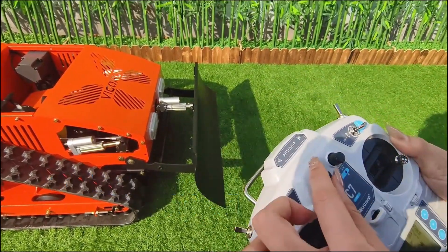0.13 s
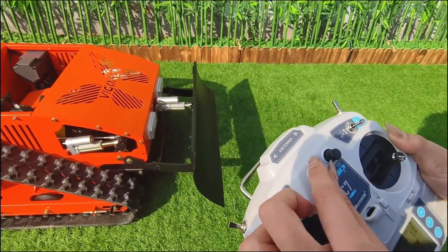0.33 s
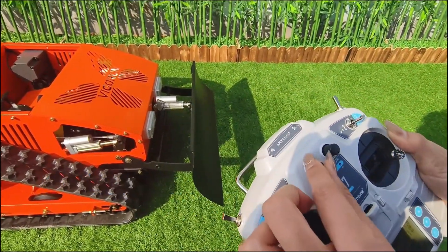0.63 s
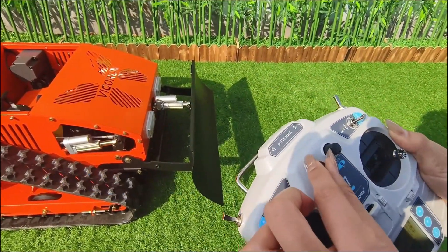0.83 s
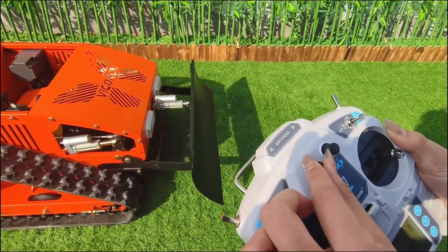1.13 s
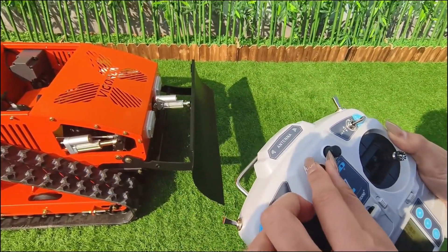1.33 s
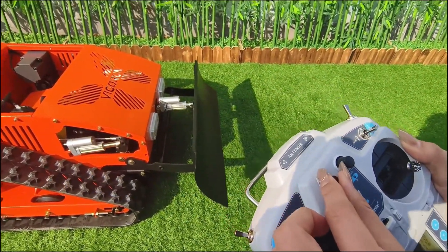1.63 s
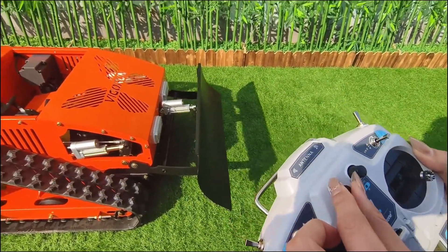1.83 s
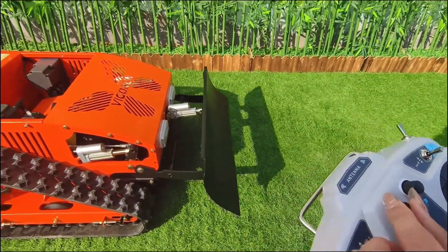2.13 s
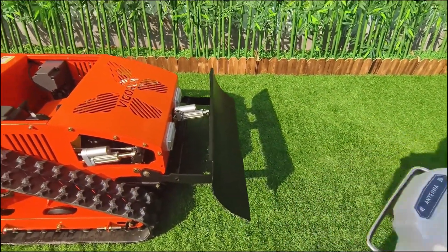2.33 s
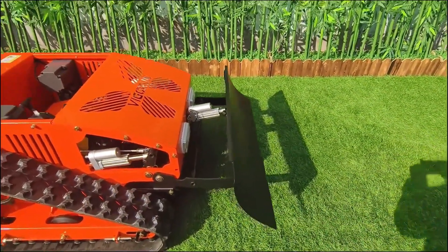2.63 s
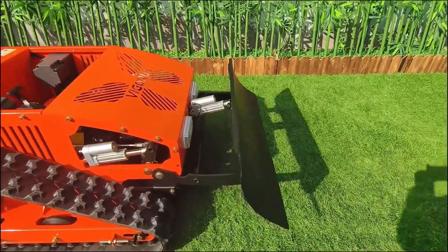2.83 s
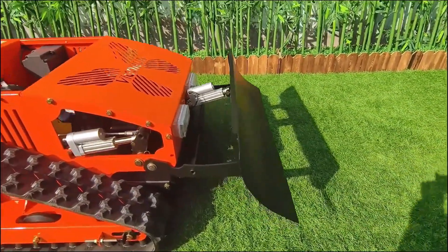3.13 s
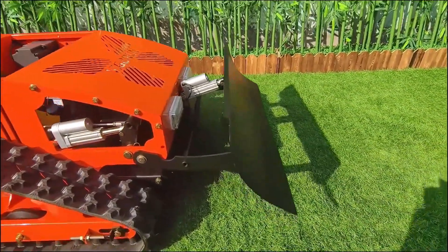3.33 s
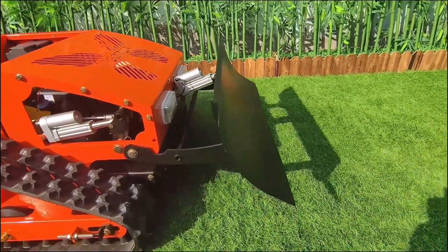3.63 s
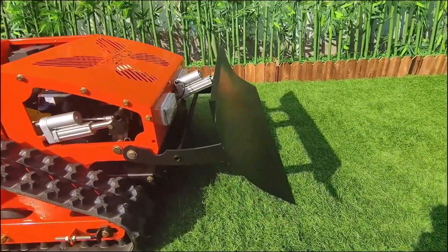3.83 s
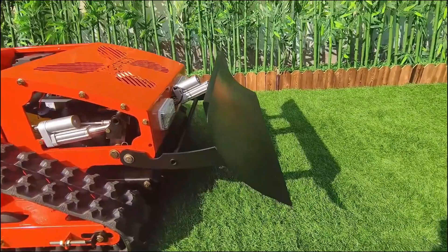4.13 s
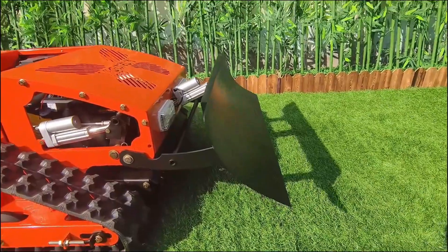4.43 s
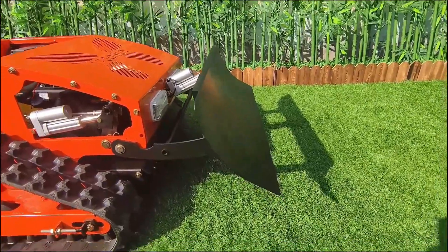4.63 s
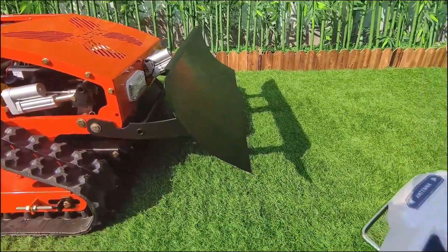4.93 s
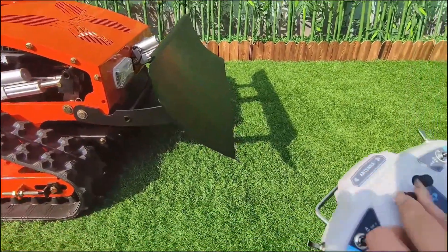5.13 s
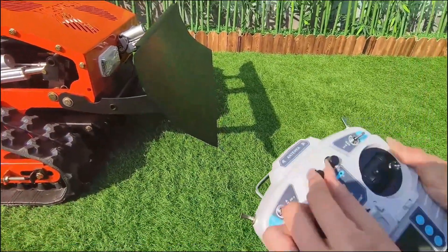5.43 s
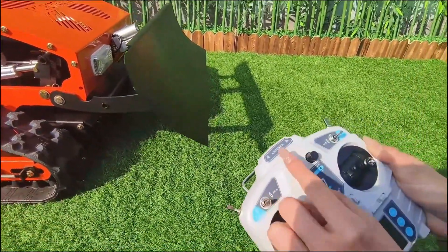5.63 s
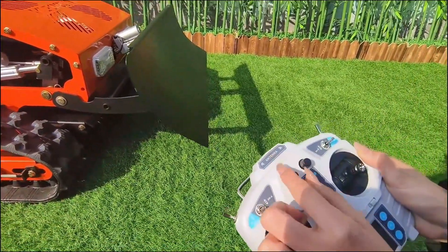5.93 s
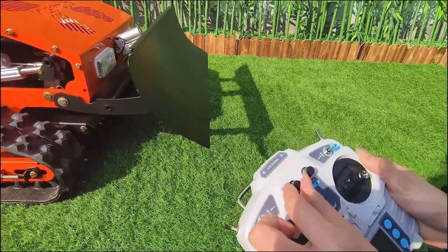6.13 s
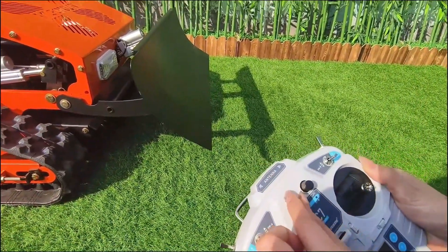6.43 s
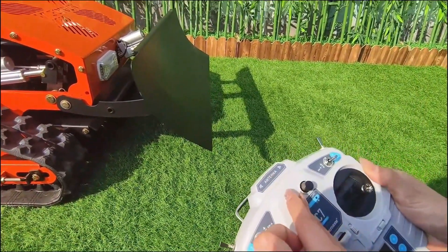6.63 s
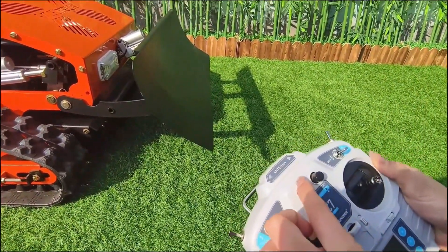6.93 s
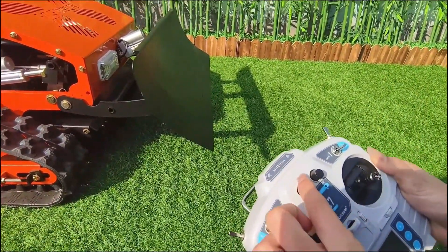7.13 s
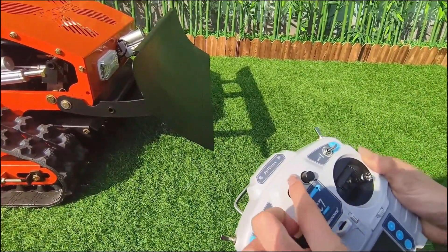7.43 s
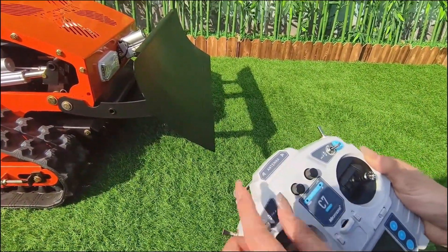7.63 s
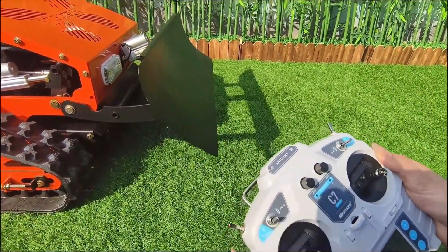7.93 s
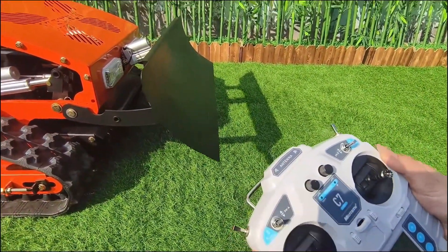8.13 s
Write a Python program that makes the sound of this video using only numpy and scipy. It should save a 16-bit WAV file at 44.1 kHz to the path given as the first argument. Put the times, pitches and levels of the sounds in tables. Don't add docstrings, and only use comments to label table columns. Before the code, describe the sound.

Quiet open air with soft wind thumps and a leafy rustle, then a geared electric motor whirs up quickly beside the listener. Its nasal, grinding whine with brush hiss and ringing steel holds steady, then sinks under weight and stops short. Feet stir grass, fingers scuff and tap a hollow plastic controller in a quick cluster. Finally a second, brighter and higher whine begins and runs to the end.

```python
import sys
import numpy as np
from scipy import signal
from scipy.fft import rfft, irfft
from scipy.io import wavfile
from scipy.ndimage import uniform_filter1d

SR = 44100
rng = np.random.default_rng(int(sys.argv[2]) if len(sys.argv) > 2 else 0)


def natural_amplitude(level_db):
    exponent = np.asarray(level_db, float) / 20
    return 10 ** exponent


def int16_out(signal):
    q = np.round(np.clip(np.atleast_2d(signal).T, -1, 1) * 32767)
    wavfile.write(sys.argv[1], SR, q.astype(np.int16))


N = 366030
TIME = np.arange(N) / SR
TEETH = 14
SWITCH_OFF_S = 4.476
LIGHT_LOAD_DB = -38


def in_time(rows):
    s, *columns = np.transpose(rows)
    return uniform_filter1d([np.interp(TIME, s, c) for c in columns], size=401, axis=1)


def at_hz(points, hz):
    points = np.array(points)
    return np.interp(np.log(hz), np.log(np.maximum(points[:, 0], 1)), points[:, 1])


def rms_one(x):
    return x / np.sqrt(np.mean(x ** 2) + 1e-20)


def drift(rate):
    r = np.exp(-80 * np.pi * rate / SR)
    slow = signal.lfilter([1], [1, -2 * r, r * r], rng.standard_normal(N // 40 + 2002))[2000:]
    return np.interp(np.arange(N) / 40, np.arange(len(slow)), rms_one(slow))


def ring(x, hz, t60):
    r = natural_amplitude(-60 / (max(t60, .005) * SR))
    w = 2 * np.pi * hz / SR
    return signal.lfilter([0, np.sin(w)], [1, -2 * r * np.cos(w), r * r], x + 1e-18)


def pan(x, db):
    return x * natural_amplitude(np.array([db / 2, -db / 2])).reshape(2, -1)


def split_at(x, hz):
    low = signal.sosfilt(signal.butter(4, hz, fs=SR, output="sos"), x)
    return low, signal.sosfilt(signal.butter(4, hz, "high", fs=SR, output="sos"), x)


def banded_noise(spectrum, likeness, patchy_db, rate, drive=0):
    low_hz, high_hz = max(spectrum[0][0], 12), min(spectrum[-1][0], 17000)
    edges = np.geomspace(low_hz, high_hz, 2 + int(3 * np.log2(high_hz / low_hz)))
    together = drift(rate)
    white = rng.standard_normal((2, 2, N)) + drive
    out = 0
    for k, (low, high) in enumerate(zip(edges, edges[1:])):
        band = signal.butter(2, [low, high], "band", fs=SR, output="sos")
        mid, side = signal.sosfilt(band, white[k % 2])
        hz = np.sqrt(low * high)
        alike = np.clip(at_hz(likeness, hz), -.99, .99)
        gain = natural_amplitude(at_hz(spectrum, hz) + patchy_db * (0.51 * together + drift(rate)))
        out = out + gain * (np.sqrt(1 + alike) * mid + np.sqrt(1 - alike) * side * [[1], [-1]])
    return out / np.sqrt(np.mean(out.mean(axis=0) ** 2))


def swells(floor_db, s, db, half_s):
    t = np.arange(0, N + 64, 64) / SR
    bells = np.exp(-((t - s[:, None]) / half_s[:, None]) ** 2)
    power = natural_amplitude(2 * floor_db) + natural_amplitude(2 * db) @ bells
    return np.interp(TIME, t, np.sqrt(power))


# time in seconds, level in dB, half length in seconds, left-right dB.
GUSTS = [
    (0.226, -43.5, 0.068, -26.5),
    (0.64, -44, 0.36, -1),
    (1.31, -50.5, 0.1, 17),
    (2.578, -41, 0.013, -17.5),
    (2.823, -44.5, 0.06, -13),
    (3.138, -49, 0.081, 14),
    (3.737, -71, 0.045, 3),
    (4.35, -54, 0.036, 15),
]
# frequency in Hz, level in dB per Hz.
WIND = [(8.8, -34), (15, -2), (43, 2.5), (71, 2), (144, -17.5), (168, -9), (200, -12), (260, -44),
        (440, -120)]
# frequency in Hz, likeness from -1 to 1.
WIND_ALIKE = [(20, 0.6), (200, 0.7)]


def wind_on_ports():
    s, db, half_s, lean_db = np.transpose(GUSTS)
    gusts = np.array([swells(-50.5, s, db + side * lean_db / 2, half_s) for side in (1, -1)])
    return gusts * banded_noise(WIND, WIND_ALIKE, patchy_db=2.5, rate=4.5)


# time in seconds, change in dB, half length in seconds.
LULL = (2.63, -3.5, 0.74)
# frequency in Hz, level in dB per Hz.
RUMBLE = [(35, -25), (60, -10), (146, -5.5), (172, -16.5), (202, -7.5), (308, -15.5), (363, -20.5),
          (527, -19), (621, -23.5), (991, -28.5), (1510, -40.5), (2300, -42.5), (2580, -52), (7230, -57),
          (16000, -62.5)]
# frequency in Hz, likeness from -1 to 1.
AIR_ALIKE = [(60, 0.64), (180, 1), (550, -0.5), (1650, -0.34), (4970, -0.18), (15000, 0.065)]
# frequency in Hz, level in dB.
HUM = [(1137, -78.5), (201.5, -60.5), (7100, -89)]


def far_traffic():
    lull_s, lull_db, half_s = LULL
    level_db = -49 + lull_db * np.exp(-((TIME - lull_s) / half_s) ** 2)
    rumble = natural_amplitude(level_db) * banded_noise(RUMBLE, AIR_ALIKE, patchy_db=0.5, rate=1.66)
    hums = sum(natural_amplitude(db) * rms_one(ring(rng.standard_normal(N), hz, 0.44)) for hz, db in HUM)
    return rumble + hums


# time in seconds, leaves in dB, grass in dB, half length in seconds.
RUSTLE = [
    (0.055, -60.5, -67, 0.13),
    (0.442, -75, -74, 0.13),
    (0.705, -69.5, -72.5, 0.071),
    (4.78, -72, -65.5, 0.15),
    (5.081, -78, -65.5, 0.16),
    (5.47, -61, -65, 0.225),
    (5.822, -61, -57.5, 0.039),
    (6.314, -70.5, -65, 0.22),
    (6.997, -82.5, -74.5, 0.66),
]
# frequency in Hz, level in dB per Hz.
LEAVES = [(2650, -46), (4500, -7), (6490, 2), (8880, 4.5), (9820, -0.5), (10900, -17.5), (14900, -8),
          (16000, -14)]
# frequency in Hz, level in dB per Hz.
GRASS = [(900, -18), (1500, 2), (3000, -3.5), (5000, -7.5), (10000, -9.5), (11000, -12.5), (16000, -5)]


def leaves_and_grass():
    s, leaves_db, grass_db, half_s = np.transpose(RUSTLE)
    leaves = banded_noise(LEAVES, AIR_ALIKE, patchy_db=1.5, rate=12.0)
    grass = banded_noise(GRASS, AIR_ALIKE, patchy_db=2.8, rate=6.5)
    return swells(-84, s, leaves_db, half_s) * leaves + swells(-88.5, s, grass_db, half_s) * grass


# time in seconds, latch peak in dB, shell in dB, left-right dB, brightest Hz.
TICKS = [(0.239, -59, -58, 10.5, 4630), (5.266, -45, -51.5, 19.5, 4170), (5.58, -49.5, -51, 9, 4200),
         (5.613, -52, -46, 6, 4150), (5.635, -47, -31.5, -5, 5600), (5.648, -41, -51, -4, 4060),
         (5.659, -58, -32, -4, 3540), (5.666, -52, -58, -2, 3900), (5.677, -51.5, -42, -5, 4100),
         (5.723, -49, -55, -3, 3450), (2.615, -34, -59, 3, 3930), (5.692, -47, -42, -7, 4100),
         (5.709, -41, -55, 0, 3380), (5.7794, -53, -96, -19, 3430), (5.83, -57, -69, -26, 3450),
         (5.902, -68, -60, -6, 3900), (5.912, -55.5, -59, -17, 4500), (5.99, -59, -54, -14, 3934),
         (6.3857, -47.5, -45.5, 5, 4900)]
# frequency in Hz, level in dB, seconds to fall 60 dB.
LATCH = [(3450, -3, .014), (4100, 0, .016), (4950, -1, .012), (5600, -5, .016), (7050, -2, .012),
         (9200, -5, .008)]
# frequency in Hz, level in dB, seconds to fall 60 dB.
SHELL = [(800, -18, 0.035), (930, -20, 0.04), (1348, -4, 0.024), (1850, -13, 0.025), (2010, -16, .025),
         (2260, -15, 0.02)]


def box_clicks(drag):
    rows = np.array(TICKS)
    at = np.round(rows[:, 0] * SR).astype(int)
    out = np.zeros((2, N))
    plucked = rng.random((2, N)) < 900.0 / SR
    grain_db = 3.2 * np.minimum(rng.exponential(1, (2, N)), 2)
    grains = drag * plucked * natural_amplitude(grain_db) * rng.choice([-1, 1], (2, N))
    scratch = rng.standard_normal(N) + 0.078 * rng.standard_normal((2, N))
    parts = ((LATCH, 1, -7.0, -14.0, .008), (SHELL, 2, -10.0, -20.0, .016))
    for modes, column, trim_db, drag_db, touch_s in parts:
        fade = natural_amplitude(-60 / (touch_s * SR))
        for hz, db, t60 in modes:
            off_db = 7.7 * (modes is LATCH) * np.abs(np.log2(hz / rows[:, 4]))
            touch_db = rows[:, column] + trim_db - off_db + rng.normal(0, 1, len(at))
            touch = np.zeros((2, N))
            touch[:, at] = pan(natural_amplitude(touch_db), rows[:, 3])
            contact = signal.lfilter([1], [1, -2 * fade, fade ** 2], (1 - fade) * touch + 1e-18)
            slip = .17 * np.cos(2 * np.pi * hz * TIME) + .4 * scratch
            out += natural_amplitude(db) * ring(contact * slip + natural_amplitude(drag_db) * grains, hz, t60)
        band = signal.butter(1, [1500, 11000], "band", fs=SR, output="sos")
        out += natural_amplitude(-12.0) * signal.sosfilt(band, contact * scratch)
    return signal.sosfilt(signal.butter(2, 650.0, "high", fs=SR, output="sos"), out)


# time in seconds, peak in dB, frequency in Hz, seconds to fall 60 dB.
THUMPS = [
    (0.236, -42, 202, 0.19),
    (5.766, -34, 218.4, 0.2),
    (5.779, -33, 214, 0.029),
    (5.796, -40, 218, 0.28),
    (5.909, -33.5, 216, 0.16),
]
PING = [
    (5.912, -52, 8694, 0.45),
    (5.784, -55, 8880, .07),
]
# time in seconds, level in dB.
CREAK = [
    (5.72, -85),
    (5.74, -68),
    (5.8, -63.5),
    (5.835, -54),
    (5.87, -68),
    (5.9, -58),
    (5.911, -54),
    (5.94, -64),
    (5.96, -85),
]


def grip_knocks():
    out = np.zeros(N)
    for s, db, hz, t60 in THUMPS + PING:
        click = np.zeros(N)
        click[round(s * SR)] = natural_amplitude(db)
        out += ring(click, hz, t60)
    creak_db = in_time([(0.0006, -120)] + CREAK + [(6, -120)])[0]
    return out + natural_amplitude(creak_db) * rms_one(ring(rng.standard_normal(N), 910, 0.025))


# time in seconds, level in dB.
SCUFF = [
    (5.56, -71),
    (5.61, -55),
    (5.649, -50.5),
    (5.7, -45.5),
    (5.754, -51.5),
    (5.831, -49),
    (5.875, -68),
    (5.908, -64),
    (6.04, -66),
]
# frequency in Hz, level in dB per Hz.
SKIN = [(290, -25), (500, -25.5), (823, 2), (1190, -13), (1330, -1), (1540, -27.5), (1880, -6), (2760, -14),
        (3410, -2), (4540, -13), (15000, -42)]
# frequency in Hz, likeness from -1 to 1.
MACHINE_ALIKE = [(300, 0.83), (700, 0.21), (1300, -0.51), (2500, -0.23), (5000, 0.19), (9000, -0.19),
                 (13000, -0.036)]


def control_box():
    drag = natural_amplitude(in_time([(SCUFF[0][0] - .01, -120)] + SCUFF + [(SCUFF[-1][0] + .01, -120)])[0])
    skin = natural_amplitude(-1.5) * drag * banded_noise(SKIN, MACHINE_ALIKE, patchy_db=1.2, rate=21.0)
    return grip_knocks() + box_clicks(drag) + skin


# switch on in seconds, screw breaks free in seconds, soft start in Hz per second,
# brush hiss at full speed in dB, power of speed by which the hiss grows.
RUNS = [
    (1.009, 1.159, 1225, -44, 1.8),
    (7.293, 7.61, 1208, -46, 0.49),
]
SECOND_RUN_S = (SWITCH_OFF_S + RUNS[1][0]) / 2
# time in seconds, tooth meetings in Hz,
# load as housing level in dB.
MOTOR = [(1.66, 788, -44), (1.8, 789, -45.5), (1.97, 793.5, -45.5), (2.12, 791, -46.5),
         (2.25, 789.5, -44.5), (2.37, 784.3, -44), (2.45, 779.7, -42.5), (2.62, 780.7, -42.5),
         (2.85, 778, -41), (3.0, 772.7, -39.5), (3.17, 766.9, -40), (3.33, 762.4, -39.5),
         (3.47, 750.8, -38), (3.66, 734.5, -37.5), (3.82, 723.4, -35.5), (3.92, 717, -35.5),
         (4.03, 709, -35.5), (4.14, 701, -35.5), (4.21, 687.5, -35.5), (4.29, 684.5, -35.5),
         (4.39, 673, -36.5), (4.56, 659.1, -31.5), (7.3, 831, -45.5), (7.7, 830, -37), (8.0, 830.3, -40.5),
         (8.3, 835.5, -43.5)]


def motor():
    full_hz, load_db = in_time(MOTOR)
    second = TIME > SECOND_RUN_S
    on, free, ramp, hiss_db, hiss_power = np.array(RUNS)[second.astype(int)].T
    hz = uniform_filter1d(np.clip(ramp * (TIME - on), 20, full_hz), size=1501)
    speed_db = 20 * np.log10(hz / full_hz)
    stuck_db = 202 * np.maximum(free - TIME, 0)
    since = np.maximum(TIME - SWITCH_OFF_S, 0) * ~second
    housing_db = load_db + 0.89 * speed_db - stuck_db - 200 * since
    brush_db = hiss_db + 0.22 * (load_db - LIGHT_LOAD_DB) + hiss_power * speed_db
    brush_db = brush_db - 152 * since - 330.0 * np.maximum(free + 0.053 - TIME, 0)
    hold_s = 0.025
    tone_db = load_db + 2.7 * speed_db - stuck_db - 347 * np.maximum(since - hold_s, 0)
    frame_db = housing_db + 0.34 * stuck_db
    running = np.clip(np.minimum(TIME - free + 0.16, hold_s + 0.078 - since) / 0.02, 0, 1)
    return hz, np.maximum([housing_db, brush_db, tone_db, frame_db], -140), running


def carried_db(mounts, hz, floor_db):
    grid = np.arange(4000.)
    joint = sum(natural_amplitude(db) / (1 + 2j * (grid - f) / width) for f, width, db in mounts)
    return np.interp(hz, grid, 10 * np.log10(np.abs(joint) ** 2 + natural_amplitude(2 * floor_db)))


# frequency in Hz, level in dB.
SWEEP_COLOUR = [
    [(500, -3), (1000, -19), (1300, -4), (1500, -6), (2000, 11.5), (2150, 1), (2330, 9), (2550, 1),
     (2750, -1), (3050, 3), (3250, -8), (3400, -5)],
    [(500, -12), (900, 7), (1300, 10.5), (1500, 1), (1900, -9), (2250, 1.5), (2380, 4), (2520, 11),
     (2620, 2), (2740, 4), (2880, 1), (3080, 5.5), (3250, 1), (3400, -4)],
]
# dB for multiples 1 to 7, then 8 and above.
SWEEP_TRIM_DB = [
    [0, -1.5, -3.5, 0, 0, 0, -1, -0.3],
    [0, 0, -2.5, 0.0014, 1, -5.5, -9, -1.9],
]


def swept_db(multiple, hz):
    first_db, second_db = (at_hz(colour, multiple * hz) + trim[min(multiple, len(trim)) - 1]
                           for colour, trim in zip(SWEEP_COLOUR, SWEEP_TRIM_DB))
    return np.where(TIME > SECOND_RUN_S, second_db, first_db) + 3.8 * drift(24)


# shaft turns away from the line, level in dB.
SIDES = [(-4, -29.5), (-2, -18), (-1, -7.5), (1, -9), (2, -25)]
# frequency in Hz, left-right dB.
PATH = [(60, -1), (110, -12), (200, 5), (380, 5.5), (700, -5), (1290, -5), (2380, -3), (4400, 7),
        (8120, 15), (15000, 4)]


def mesh_line(turns, multiple, hz, level_db, flutter_db, sides_db, lean_db=0):
    line = natural_amplitude(flutter_db * drift(22)) * np.exp(.55j * multiple ** .5 * drift(8.8))
    for off, db in SIDES:
        side_db = db + sides_db - lean_db * np.sign(off) + 4.6 * drift(2.5)
        line = line + natural_amplitude(side_db) * np.exp(2j * np.pi * (off / TEETH * turns + rng.random()))
    line = np.sqrt(2) * natural_amplitude(level_db) * line * np.exp(2j * np.pi * multiple * turns)
    path_db = at_hz(PATH, np.maximum(multiple * hz, 1)) + 2.2 * drift(0.59)
    lean = np.tanh(path_db * np.log(10) / 40)
    ahead = 0.35 + 0.27 * drift(3.6)
    return (line * (1 + (lean - 1j * ahead) * [[1], [-1]])).imag


# frequency in Hz, width in Hz, dB over load.
LOW_MOUNTS = [(557, 79, -11), (701, 23, -5), (739, 18.1, -10), (788, 9, -9), (821, 17, -2.5)]
MOUNTS = [(1450, 30, -7.5), (1427, 35, 3), (1502, 12, 9), (1538, 12.4, 13.5), (1587.4, 17, -4),
          (1986.5, 16, 9.5), (2020.3, 12, 14.5), (2064, 19, 12.5), (2089, 23, 3.5), (2271.6, 25, 6),
          (2356, 30, 1.5), (2420, 36, -2.5), (2511, 31.8, 11), (2690, 31, 4), (2737, 25, 6.5),
          (2790, 20, 3), (2950, 24, 6.5), (3051, 50, 2), (3108, 25, 4.5), (3181, 31, 7.5), (3370, 54, 7.5)]
MOUNT_FLOOR_DB = [-30, -24.5, -4, -5.5]
SWEEP_LOSS_DB = [4.9, 4.4, 1.5, 0.56]
FLUTTER_DB = [2, 2, 0.93, 0.96]
SIDE_TRIM_DB = [-11, -5.5, -5.5, -4.5]
SIDE_LEAN_DB = [-3, 2.5, 7, -0.5]


def low_tones(turns, hz, housing_db, tone_db, spin_up, rough_db):
    tones = 0
    for k, floor_db in enumerate(MOUNT_FLOOR_DB):
        mount_db = carried_db(MOUNTS if k else LOW_MOUNTS, (k + 1) * hz, floor_db)
        db = tone_db + mount_db - spin_up * (SWEEP_LOSS_DB[k] + mount_db - swept_db(k + 1, hz))
        over_db = db - housing_db
        flutter_db = np.maximum(rough_db + FLUTTER_DB[k] - .12 * np.maximum(over_db + 13.5, 0), .3)
        sides_db = SIDE_TRIM_DB[k] + 7.0 * spin_up - 0.79 * np.clip(over_db, 0, 15)
        tones = tones + mesh_line(turns, k + 1, hz, db, flutter_db, sides_db, SIDE_LEAN_DB[k])
    return tones


# multiple of the tooth rate, dB over housing.
UPPER = [(5, -1.5), (6, 2), (7, 5), (8, 1.5), (9, 4.5), (10, 1.5), (11, -1.5), (12, -2), (13, -4.5)]
# frequency in Hz, level in dB.
RADIATION = [(500, -13), (1500, -22), (2250, -28), (2450, -13), (3150, -8), (3400, -1), (4000, -11),
             (4300, -10), (4700, -16.5), (5100, -19), (5600, -15), (6200, -23.5), (7000, -21),
             (9000, -17.5), (11000, -46)]


def upper_tones(turns, hz, housing_db, spin_up, rough_db, running):
    tones = 0
    for k, db in UPPER:
        pitch = k * hz
        level_db = housing_db + db + at_hz(RADIATION, pitch) + 2.8 * drift(5.2)
        level_db -= spin_up * np.where(pitch > 4000, 5.0, 9.5 * (pitch > 3150))
        level_db -= 4.5 * spin_up * (k - 6.2)
        level_db += 0.6 * spin_up * (pitch < 3600) * carried_db(MOUNTS, pitch, 0.0)
        level_db += spin_up * swept_db(k, hz)
        line = mesh_line(turns, k, hz, level_db, rough_db + 1.0, -2.5 + 5.0 * spin_up)
        tones = tones + np.roll(running, -SR // 20) * line
    return tones


# frequency in Hz, width in Hz, dB over load.
SECOND_MOUNT = [(675.8, 24, -11)]


def second_gear(turns, hz, tone_db, running):
    share = .873
    level_db = tone_db + carried_db(SECOND_MOUNT, share * hz, -22.5)
    return running * mesh_line(turns, share, hz, level_db, 4.7, sides_db=-27.5)


# times per shaft turn, level in dB.
SHAFT_LINES = [(15, 0), (37, -4.5), (38, -2.5), (39, -8), (40, -4.5), (41, 0.5)]
# frequency in Hz, width in Hz, dB over load.
BLADE_MODE = [(828, 18, -15), (2064, 16, -5), (2310, 55, -9)]


def shaft_tones(turns, hz, tone_db, spin_up, running):
    tones = 0
    for order, db in SHAFT_LINES:
        level_db = tone_db + db + carried_db(BLADE_MODE, order / TEETH * hz, -38.5) + 2.6 * drift(8.0)
        level = running * (1 - spin_up) * natural_amplitude(level_db)
        phase = 2 * np.pi * order / TEETH * turns + 0.93 * drift(8.3)
        tones = tones + pan(level * np.sin(phase), 3.3)
    return tones


def shaft_scars(shaft_turns, count, lasting):
    wear = shaft_turns / lasting
    flaws = rng.standard_normal((2, int(wear[-1]) + 2, count))
    spot, old = (shaft_turns % 1 * count).astype(int), wear.astype(int)
    fade = np.pi / 2 * (wear % 1)
    return flaws[:, old, spot] * np.cos(fade) + flaws[:, old + 1, spot] * np.sin(fade)


# frequency in Hz, level in dB per Hz.
HOUSING = [(180, -46), (300, -11.5), (611, -8.5), (679, -16), (1010, -5.5), (1300, -8.5), (1520, 5),
           (1870, 1.5), (2310, -0.5), (2540, -1.5), (3170, -2), (3480, -11.5), (4400, -7.5), (5100, -15),
           (5670, -11), (6380, -18), (7000, -33), (9100, -56), (15400, -120)]


def housing_grind(hz, housing_db, knock, scars):
    noise = banded_noise(HOUSING, MACHINE_ALIKE, patchy_db=2.2, rate=7.4, drive=0.6 * scars)
    dull, top = split_at(natural_amplitude(housing_db) * knock * noise, 3600)
    return dull + top * np.clip(hz / 336, 0, 1) ** 3.8


# frequency in Hz, level in dB per Hz.
BRUSHES = [(1760, -26), (3000, -6.5), (3360, -9.5), (4260, -11.5), (5100, -17), (5600, -12), (6220, -24.5),
           (6950, -12), (9600, -13), (10600, -19.5), (15100, -14.5), (16000, -16)]
TOP_OPEN_HZ = [
    640,
    427,
]


def brush_hiss(hz, housing_db, brush_db, knock, scars):
    noise = banded_noise(BRUSHES, MACHINE_ALIKE, patchy_db=0.75, rate=24.0, drive=0.43 * scars)
    low, air = split_at(natural_amplitude(brush_db) * knock * noise, 9800)
    open_hz = np.where(TIME > SWITCH_OFF_S + 1, TOP_OPEN_HZ[1], TOP_OPEN_HZ[0])
    spark_db = 6 / 2 * (np.tanh((TIME - 3.346) / .06) - 1)
    air_db = 0.3 * (housing_db - LIGHT_LOAD_DB) + spark_db
    return low + air * np.clip(hz / open_hz, 0, 1) ** 6 * natural_amplitude(air_db)


# frequency in Hz, level in dB, seconds to fall 60 dB, left-right dB.
FRAME = [(665, -18.5, 0.98, -4.5), (858, -12, 0.075, -7), (1510, -23.5, 0.2, -4), (1447, -6.5, 0.11, 5),
         (1305, -9.5, 0.14, -4.5), (1660, -20.5, .22, 3), (1720, -14.5, 0.21, 2.5), (1790, -0.5, 0.28, 4.5),
         (1992, -4.5, 0.46, -4.5), (2062.3, -2, 0.54, 6.5), (2229, -9.5, 0.26, 12.5), (2294, 3, 0.28, 6.5),
         (2495, 0.5, 0.21, 1), (2716, -1.5, 0.27, -10.5), (2618, -25, 0.13, 3), (3050, 2, 0.079, -3),
         (3110, -11.5, 0.19, 16), (3205, -3.5, 0.04, -18)]


def frame_rings(tones, housing_db, frame_db, spin_up, running):
    rattle = rng.standard_normal(N) + 0.45 * rng.standard_normal((2, N))
    shake = natural_amplitude(frame_db - 37.0) * running * rattle + natural_amplitude(-53 - 1.5 * spin_up) * tones
    frame = sum(pan(natural_amplitude(db) * ring(shake, f, min(t60, .7)), lean) for f, db, t60, lean in FRAME)
    judder_db = (in_time(MOTOR)[1] + housing_db) / 2 - 38
    return frame + ring(natural_amplitude(judder_db) * spin_up * running * rattle, 886, 0.14)


# time in seconds, left-right difference signal in dB, left-right dB.
BEARING = [
    (1.0, 4.5, -4),
    (2.2, 5.5, -2.5),
    (2.7, 1, -1),
    (4.0, 1, -1),
    (4.6, 2.5, 2.5),
    (7.5, 5.5, -2.5),
    (8.3, 6.5, -8.5),
]


def actuator():
    hz, (housing_db, brush_db, tone_db, frame_db), running = motor()
    turns = np.cumsum(hz) / SR
    spin_up = np.clip(uniform_filter1d(np.gradient(hz), size=2001) * SR / 900, 0, 1)
    rough_db = 1.86 + .8 * spin_up
    tones = low_tones(turns, hz, housing_db, tone_db, spin_up, rough_db)
    tones += upper_tones(turns, hz, housing_db, spin_up, rough_db, running)
    tones += second_gear(turns, hz, tone_db, running)
    tones += shaft_tones(turns, hz, tone_db, spin_up, running)
    scars = running * shaft_scars(turns / TEETH, count=640, lasting=9.0)
    knock = 1 + 0.04 * np.cos(2 * np.pi * turns / TEETH * 2)
    noise = housing_grind(hz, housing_db, knock, scars) + brush_hiss(hz, housing_db, brush_db, knock, scars)
    frame = frame_rings(tones, housing_db, frame_db, spin_up, running)
    lean_db = np.clip(in_time(BEARING)[1], -9, 9)
    return natural_amplitude(-1.5 * spin_up) * tones + frame + pan(noise, lean_db)


# frequency in Hz, level in dB.
BESIDE = [(400, -3), (900, -4.5), (1250, -9), (1600, -4.5), (2050, -7.5), (2300, -3.5), (2500, 0),
          (3000, -1), (3600, -2), (6000, -2), (10000, 1), (11800, 6), (12300, -12), (13000, -7),
          (13500, -6), (15000, 3.5)]


def from_beside(x):
    start = int(SECOND_RUN_S * SR)
    hz = np.arange((N - start) // 2 + 1) * SR / (N - start) + 1
    coloured = irfft(rfft(x[:, start:]) * natural_amplitude(at_hz(BESIDE, hz)), N - start)
    return np.hstack([x[:, :start], coloured])


def scene():
    machine = from_beside(actuator())
    low_pass = signal.butter(1, 6500, fs=SR, output="sos")
    side = signal.sosfilt(low_pass, machine - machine.mean(axis=0))
    machine = machine + (natural_amplitude(in_time(BEARING)[0]) - 1) * side
    return machine + control_box() + wind_on_ports() + far_traffic() + leaves_and_grass()


def top_cut(x):
    return signal.sosfilt(signal.butter(12, 16600, fs=SR, output="sos"), x)


def record(dry):
    steep = signal.ellip(N=12, rp=.5, rs=70, Wn=15760, fs=SR, output="sos")
    cut = signal.sosfilt(steep, dry)
    return top_cut(cut)


dry = scene()
out = record(dry)
int16_out(out)
```